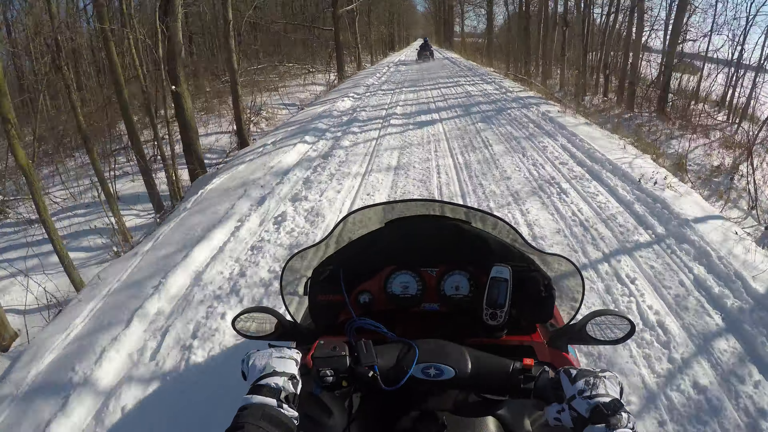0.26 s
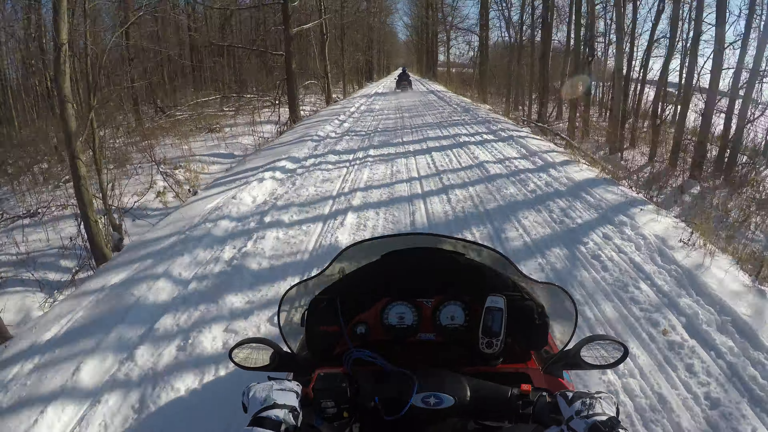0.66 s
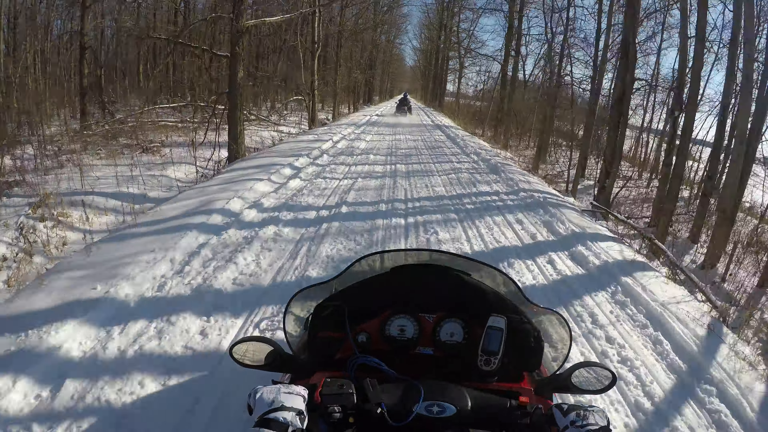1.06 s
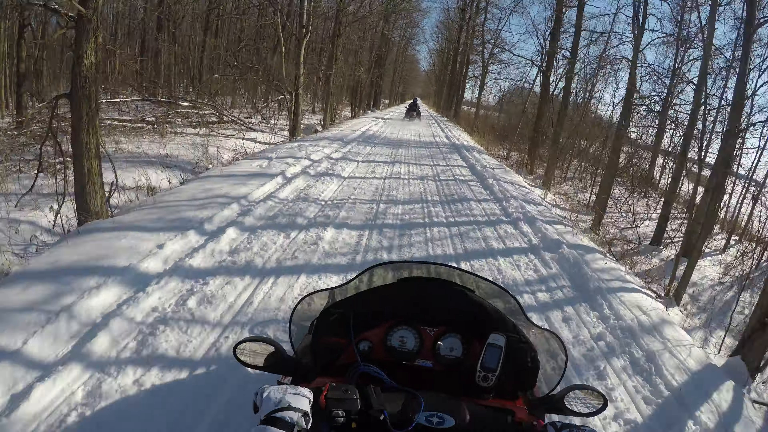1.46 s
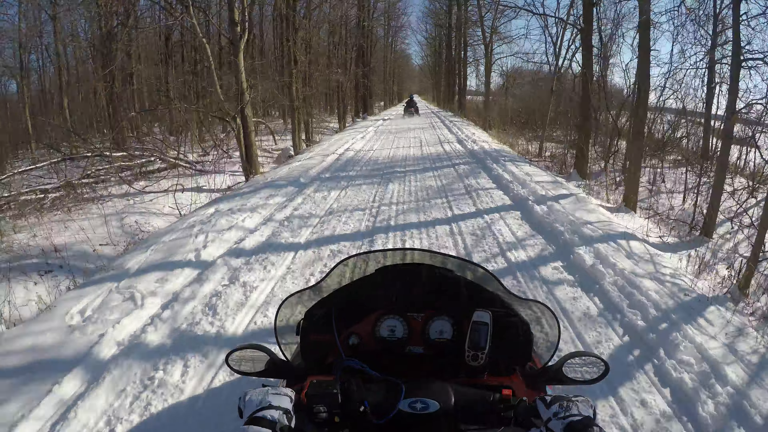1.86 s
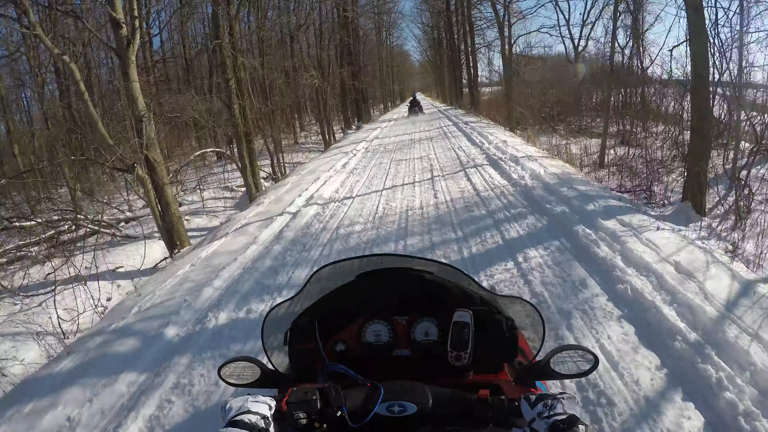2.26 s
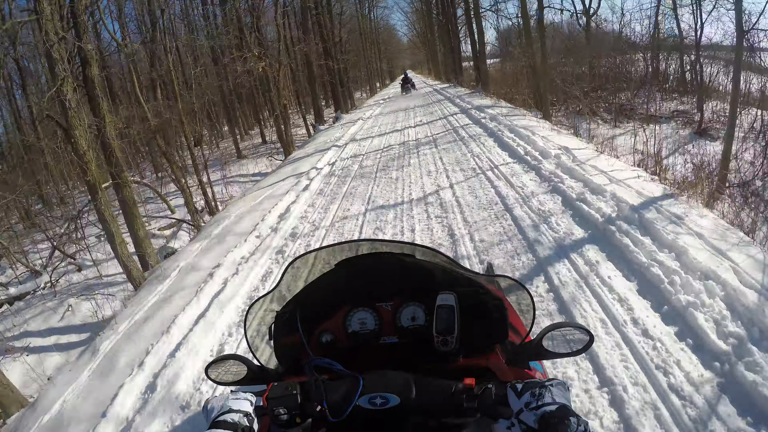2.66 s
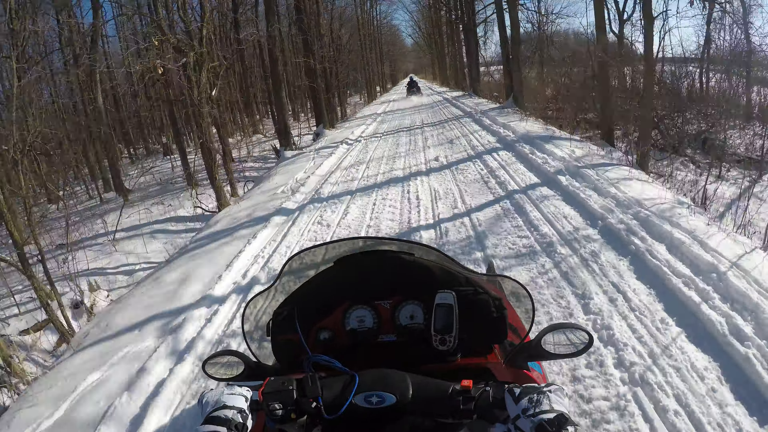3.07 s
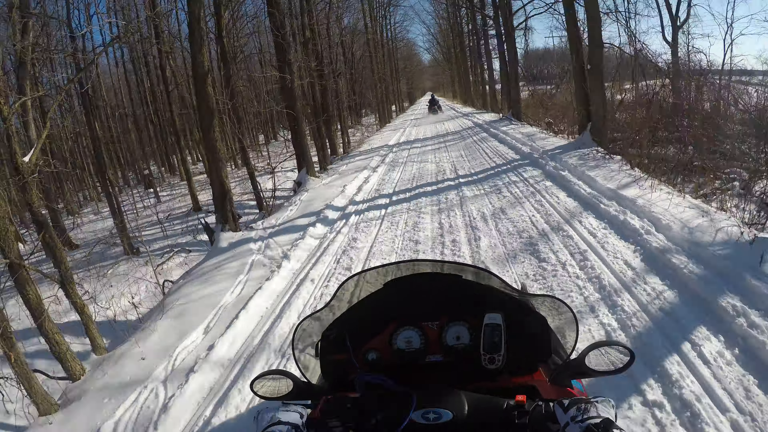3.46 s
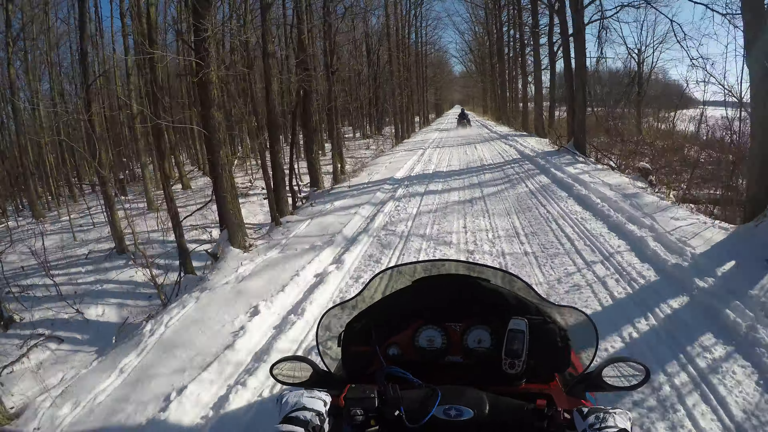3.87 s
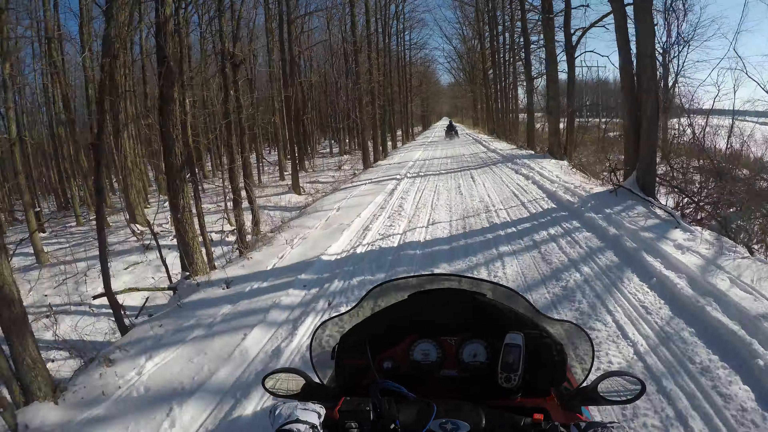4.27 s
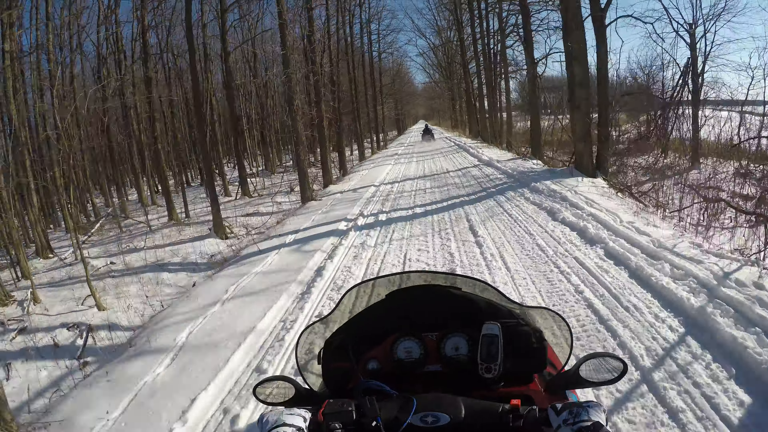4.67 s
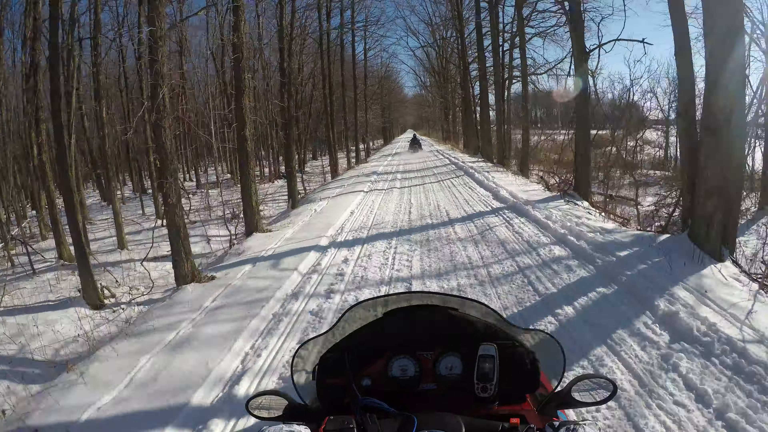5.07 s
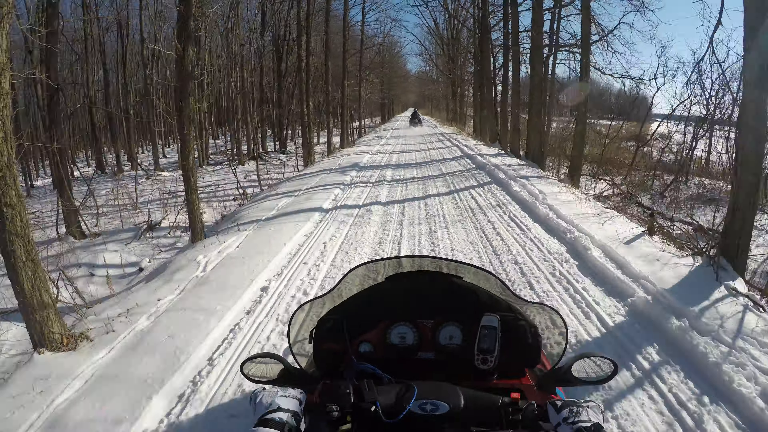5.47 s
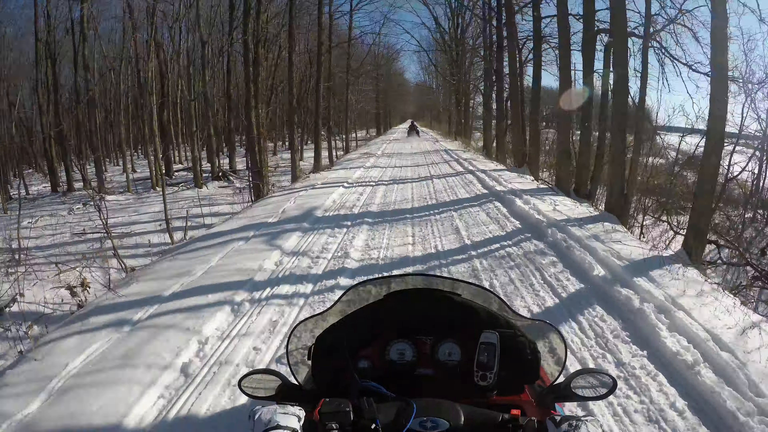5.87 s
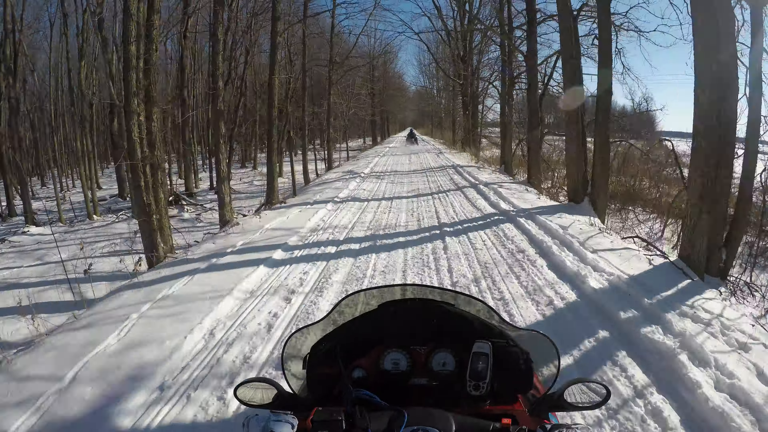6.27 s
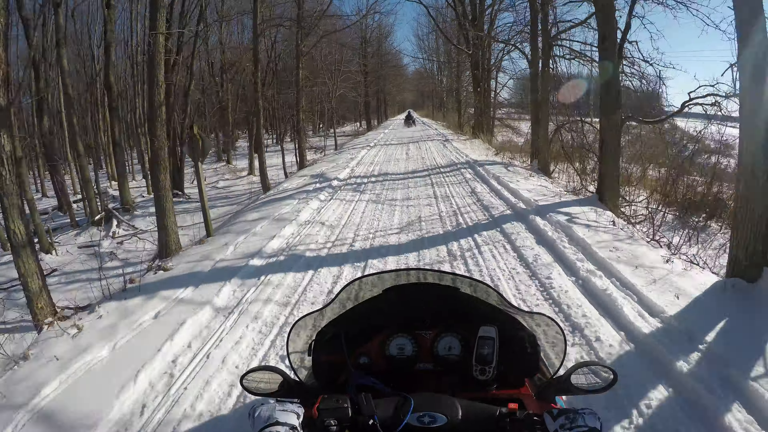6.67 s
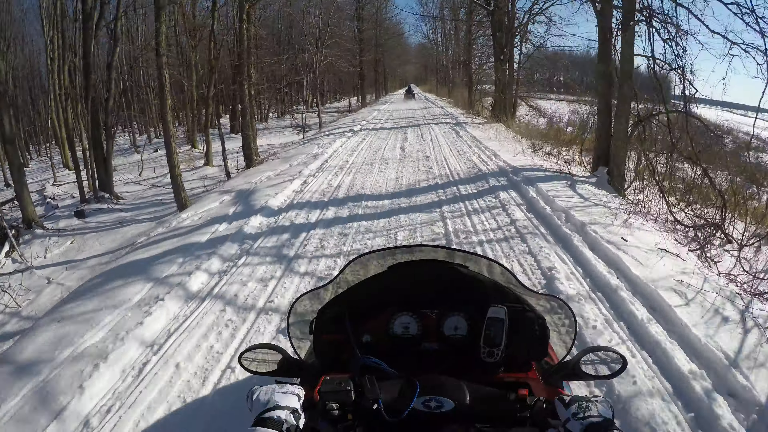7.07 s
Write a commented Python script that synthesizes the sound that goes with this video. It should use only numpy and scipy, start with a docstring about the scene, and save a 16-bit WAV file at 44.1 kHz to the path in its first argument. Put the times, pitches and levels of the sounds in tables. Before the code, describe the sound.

A single-channel, close helmet-mounted perspective on a moving snowmobile, already at speed when the sound begins. A two-cylinder engine drones with a low firing tone near 180 Hz, a nasal exhaust growl and a raspy clatter. Just below, the track lugs hum around 165 Hz, swelling and wavering. From 0 to 4.6 s engine pitch creeps up slightly; from about 5 to 6.5 s it sags, then climbs steadily from 7 s, reaching its highest, brightest and strongest drone around 8.5 to 9.2 s. Two faint fixed whines near 1.2 and 1.3 kHz come and go. Headwind surrounds everything: deep buffeting, low rumble, gusty roar, smoother rush and subdued hiss, with sharper gusts near 0.5, 2.4, 4.4, 5.9, 6.7, 7.7 and 8.4 s. Rough grain and brief dull knocks on the housing recur irregularly, clustering around 1.9 and 5.9 s. It ends still riding, without stopping.

```python
"""A two-cylinder engine drones as a snowmobile runs along a trail, heard at a closed housing on the helmet.
Engine: harmonics of the crank speed, weighted by exhaust resonances, with a noisy clatter once a turn.
Track: lugs on a toothed sprocket hum at the lug rate. Two thin whines hold their pitch.
A rough grain of small random damped knocks is stronger where the roar is; short thumps knock the housing.
Headwind: coloured noises that buffet, rumble, roar, rush and hiss around the housing."""
import sys
import numpy as np
from scipy import signal
from scipy.io import wavfile
from scipy.ndimage import uniform_filter1d, minimum_filter1d, map_coordinates

SR = 44100
rng = np.random.default_rng(int(sys.argv[2]) if len(sys.argv) > 2 else 0)


def to_wav(sig):
    """Store sig (one row per channel, or 1-D mono) as 16-bit WAV at the path in sys.argv[1].

    Samples outside -1..1 are clipped; the rate is SR.
    """
    pcm = np.clip(np.atleast_2d(sig), -1, 1) * 32767
    pcm = np.round(pcm).astype(np.int16)
    wavfile.write(sys.argv[1], SR, pcm.T)  # frames by channels


N = 407484
TIME_S = np.arange(N) / SR


def gain_of(db):
    """Logarithmic level: decibels become an amplitude factor."""
    return 10 ** (np.asarray(db) / 20)


def evened(x):
    """Normalisation: scales a signal to rms 1."""
    return x / np.sqrt(np.mean(x ** 2) + 1e-20)


def columns(rows):
    """Linear interpolation: each column of a curve table becomes one value a sample."""
    time_s, *values = np.transpose(rows)
    return [np.interp(TIME_S, time_s, v) for v in values]


def drift(per_s):
    """Low-rate random fluctuation of rms 1, with up to per_s swings a second."""
    knots = rng.standard_normal(400)
    wander = map_coordinates(knots, [TIME_S * 2 * per_s], order=1)
    return wander * np.sqrt(1.5)  # joining the knots by lines loses a third of the power


def tone(turns, db, blur, fade_db, per_s):
    """Phase and amplitude modulation: a sine wanders by blur (rms radians) and fade_db (rms)."""
    phase = 2 * np.pi * (turns + rng.random()) + blur * drift(per_s)
    level_db = db + fade_db * drift(per_s)
    return np.sqrt(2) * gain_of(level_db) * np.sin(phase)


def noise(colour, size, patchy_db, flicker_db):
    """Spectral synthesis: random short-time spectra, with drifting patches and a flicker shared by all bands."""
    frames = N // (size // 4) + 5
    bin_hz = np.fft.rfftfreq(size, 1 / SR)
    real, imaginary, patches = rng.standard_normal((frames, len(bin_hz), 3)).T
    patches = uniform_filter1d(patches, size=size // 64, axis=0)  # smooth over frequency
    patches = evened(uniform_filter1d(patches, size=8192 // size, axis=1))  # and over time
    flicker = evened(uniform_filter1d(rng.standard_normal(frames), size=4096 // size))
    colour_hz, colour_db = np.transpose(colour)
    # silent outside the band of the colour table
    shape_db = np.interp(np.log(bin_hz + 1), np.log(colour_hz), colour_db, left=-np.inf, right=-np.inf)
    level_db = shape_db[:, None] + patchy_db * patches + flicker_db * flicker
    spectra = (real + 1j * imaginary) * gain_of(level_db)
    sound = signal.istft(spectra, nperseg=size, noverlap=size * 3 // 4)[1]
    return evened(sound[:N])


# crank speed, before the flywheel smooths it: time_s, speed [turns per s]
CRANK_SPEED = [(0, 89.6), (.65, 89), (1.6, 89.55), (2.0, 90.9), (2.65, 91.15), (3.3, 92.4), (4.0, 92.97),
               (4.6, 94.1), (4.8, 93.95), (5.25, 92.75), (5.75, 90.25), (6.25, 87.3), (6.55, 86.4),
               (6.8, 86.9), (7.5, 90.03), (7.85, 92.4), (8.25, 94.4), (8.45, 96.2), (8.63, 98.7),
               (8.8, 100.1), (9.0, 100.9), (9.24, 101.2)]
# level of the firing tone: time_s, level_db
FIRING_LEVEL = [(0, -18), (.45, -26), (1.4, -24.5), (1.7, -18.5), (2.5, -20), (3.1, -27), (3.6, -19.5),
                (4.1, -12.5), (4.5, -19.5), (5.2, -21.5), (6.05, -34.5), (6.6, -27), (7.05, -26),
                (7.4, -13.5), (7.65, -20.5), (8.2, -25), (8.4, -14.5), (8.65, -13.5), (8.85, -7.5),
                (9.05, -9), (9.24, -16)]
# engine load, before the exhaust resonances: time_s, growl_db [multiples 3 to 6],
# rasp_db [multiples 7 and up], brightness_db [per octave above the tenth multiple]
ENGINE_LOAD = [(0, -43, -42, -6), (.6, -41, -38, -7), (1, -38, -37, -8), (1.5, -40, -37.5, -7),
               (2, -38, -39, -5), (2.5, -36, -40, -2), (3, -34, -40, -1), (3.5, -38, -37, -3),
               (3.9, -45, -38, -3), (4.4, -45, -42, -1), (4.75, -42, -42, -1), (5, -37, -39.5, -4),
               (5.4, -45, -38, -7), (5.8, -42, -36, -9), (6.2, -38, -40, -6), (6.7, -37, -42, -6),
               (7.1, -37, -39, -3), (7.4, -36, -39, -2), (7.75, -40, -38, -2), (8.1, -44, -36, 1),
               (8.3, -45, -35, 4), (8.58, -45, -35, 5), (8.8, -44, -39, 1), (9.24, -40, -39, -3)]
# resonances of exhaust and cowl: pitch_hz, width_hz [between the points 6 dB down], gain_db
EXHAUST_RESONANCES = [(275, 40, 8.5), (368, 50, 7.5), (440, 50, -4), (530, 60, 2.5), (700, 60, -4),
                      (835, 80, 2), (905, 50, 2), (1000, 65, 4), (1132, 105, 7), (1218, 50, 1),
                      (1312, 50, 1), (1420, 120, -2), (1650, 130, .5), (1840, 170, 2.5), (1960, 80, -6)]
# colour of the clatter, and of the rush of the wind: pitch_hz, density_db [relative, per Hz]
RUSH_COLOUR = [(500, -2.5), (800, -1.5), (1100, 2.5), (1400, 1.5), (1900, -1), (2100, -5.5), (2400, -4.5),
               (2900, -22)]
CRANK_SHAKE = .012  # rms radians; uneven firing shakes the crank, so high multiples blur most
HIGH_EVEN_DB = -4.5  # even multiples above the sixteenth are weaker
CLATTER_DB, CLATTER_GATE = 2., .9  # dB re the rasp before pulsing; depth of the pulse, a share


def engine():
    """Harmonic series through resonances: two firings a turn drone, and multiples swell near a resonance."""
    crank_hz, = columns(CRANK_SPEED)
    firing_db, = columns(FIRING_LEVEL)
    growl_db, rasp_db, bright_db = columns(ENGINE_LOAD)
    # the inertia of the flywheel rounds changes of speed
    smooth_hz = uniform_filter1d(crank_hz, size=SR // 5, mode="nearest")
    turns = np.cumsum(smooth_hz) / SR
    turns = turns + CRANK_SHAKE * drift(7.) / (2 * np.pi)
    out = tone(2 * turns, firing_db, blur=.15, fade_db=.7, per_s=10.)
    for k in range(3, 22):
        passed_power = 0
        for centre_hz, width_hz, gain_db in EXHAUST_RESONANCES:
            detuning = 2 * (k * crank_hz - centre_hz) / width_hz
            passed_power = passed_power + gain_of(2 * gain_db) / (1 + detuning ** 2) ** 2
        if k < 7:
            source_db = growl_db
        else:
            source_db = rasp_db + bright_db * max(np.log2(k / 10), 0)
        if k > 16 and k % 2 == 0:
            source_db = source_db + HIGH_EVEN_DB
        out += np.sqrt(passed_power) * tone(k * turns, source_db, blur=.15, fade_db=.9, per_s=2.5)
    pulse = 1 + CLATTER_GATE * np.cos(2 * np.pi * turns)
    clatter = noise(RUSH_COLOUR, size=512, patchy_db=0., flicker_db=1.)
    return out + gain_of(rasp_db + CLATTER_DB) * pulse * clatter


# track speed: time_s, speed [lugs per s]
LUG_RATE = [(0, 171.7), (.75, 169.5), (1.0, 167.4), (1.5, 167.5), (2.0, 164.5), (2.25, 164.8),
            (2.55, 165.5), (2.75, 164.2), (4.0, 164.8), (4.5, 167.6), (5.0, 167.7), (5.25, 169), (5.5, 167),
            (5.7, 168), (5.9, 169.2), (6.75, 163.7), (7.5, 163.4), (8.0, 160.5), (8.3, 163.8), (8.6, 164.5),
            (8.8, 169), (9.0, 171.5), (9.24, 173.7)]
# lug hum: time_s, hum_db, octave_db
LUG_HUM = [(0, -27, -27), (.17, -13.5, -32), (.26, -20.5, -41), (.5, -13.5, -25), (.65, -19.5, -34),
           (.85, -15, -25), (1.1, -15.5, -36), (1.35, -14, -26), (1.41, -12.5, -23), (1.46, -21, -42),
           (1.52, -13.5, -29), (2.0, -12.5, -28), (2.45, -13, -31), (3.0, -15.5, -31), (3.58, -14, -30),
           (3.7, -9.5, -29), (3.95, -8.5, -35), (4.37, -11, -36), (4.44, -22, -27), (4.54, -26, -23),
           (4.65, -17, -30), (4.8, -17, -23.5), (4.95, -14.5, -25.5), (5.35, -17, -24), (5.66, -12, -26.5),
           (5.74, -16, -20), (5.87, -31, -17.5), (5.96, -15, -26), (6.36, -13, -32), (6.45, -24.5, -24),
           (6.52, -10, -22), (6.6, -12.5, -31), (6.95, -18, -30), (7.25, -11.5, -32), (7.58, -9.5, -35),
           (7.64, -21, -23), (7.8, -15.5, -23.5), (8.1, -28, -32), (8.3, -9, -33), (8.57, -12.5, -21.5),
           (8.68, -23, -27), (8.85, -25, -29.5), (9.1, -18, -31), (9.24, -22, -30)]
# strength of the sprocket wobble: time_s, level_db
WOBBLE_LEVEL = [(0, -32), (.9, -27), (1.4, -25), (1.9, -32), (2.5, -26), (3, -32), (4.7, -34), (5.1, -22),
                (6.2, -21), (6.6, -31), (7, -30), (7.4, -38), (9.24, -36)]
# multiples of its own turn from an uneven sprocket: multiple [of the turn rate], level_db [re the wobble]
WOBBLE_MULTIPLES = [(2, -8), (4, -1), (5, 0)]
# multiples beside the lug hum, from its beating: multiple [of the turn rate], level_db [re the smoothed hum]
SIDE_MULTIPLES = [(6, -16), (10, -14)]
SPROCKET_TEETH = 8


def track():
    """Tooth-meshing tones: lugs on sprocket teeth give a hum, its octave and multiples of the sprocket turn."""
    hum_db, octave_db = columns(LUG_HUM)
    wobble_db, = columns(WOBBLE_LEVEL)
    lugs = np.cumsum(columns(LUG_RATE)[0]) / SR
    sprocket_turns = lugs / SPROCKET_TEETH
    out = tone(lugs, hum_db, blur=.27, fade_db=1.3, per_s=11.)  # the hum swells and sinks at random
    out += tone(2 * lugs, octave_db, blur=.8, fade_db=2., per_s=11.)
    for multiple, db in WOBBLE_MULTIPLES:
        out += tone(multiple * sprocket_turns, wobble_db + db, blur=.3, fade_db=1.5, per_s=3.)
    slow_hum_db = uniform_filter1d(hum_db, size=SR // 2)
    for multiple, db in SIDE_MULTIPLES:
        out += tone(multiple * sprocket_turns, slow_hum_db + db, blur=.6, fade_db=2., per_s=6.)
    return out


# levels of the two whines: time_s, lower_db, upper_db
WHINE_LEVELS = [(0, -42.5, -51), (1.15, -33.5, -47), (1.9, -34, -40), (2.15, -43, -39.5), (3.1, -50, -50.5),
                (3.75, -29.5, -42), (4.4, -48, -49.5), (5.25, -33, -43), (6.2, -33.5, -44), (7.4, -36, -50),
                (7.9, -34.5, -44.5), (8.9, -43, -44), (9.24, -29, -42)]
LOWER_WHINE_HZ, UPPER_WHINE_HZ = 1222, 1313


def whines():
    """Steady-frequency tones: two thin whines keep their pitch whatever the engine does."""
    lower_db, upper_db = columns(WHINE_LEVELS)
    lower = tone(LOWER_WHINE_HZ * TIME_S, lower_db, blur=.6, fade_db=1.2, per_s=12.)
    upper = tone(UPPER_WHINE_HZ * TIME_S, upper_db, blur=.6, fade_db=1.2, per_s=12.)
    return lower + upper


GRAIN_DB, GRAIN_PER_S = -11, 120  # level re the roar column of the wind; mean knocks a second
GRAIN_SPREAD_DB = 3.5  # mean of the exponential spread of knock sizes, before its cap
GRAIN_LOW_HZ, GRAIN_HIGH_HZ, GRAIN_PITCHES = 422, 1510, 8
GRAIN_T60_S, GRAIN_RISE_S = .015, .00065  # time to ring down 60 dB; soft start


def rough_grain():
    """Random impulses into damped resonators: small knocks make a rough grain, stronger where the roar is."""
    happens = rng.random(N) < GRAIN_PER_S / SR
    spread = np.minimum(rng.exponential(1, N), 4)  # mostly small, a few large
    knock_size = gain_of(GRAIN_SPREAD_DB * spread) * happens
    kind = rng.integers(0, GRAIN_PITCHES, N)
    t = np.arange(2000) / SR
    envelope = (1 - np.exp(-(t / GRAIN_RISE_S) ** 2)) * gain_of(-60 * t / GRAIN_T60_S)
    knocks = np.zeros(N)
    for k, pitch_hz in enumerate(np.geomspace(GRAIN_LOW_HZ, GRAIN_HIGH_HZ, GRAIN_PITCHES)):
        ring = envelope * np.sin(2 * np.pi * pitch_hz * t)
        knocks += signal.oaconvolve(knock_size * (kind == k), ring)[:N]
    roar_db = columns(WIND_LEVELS)[2]
    return gain_of(GRAIN_DB + roar_db) * evened(knocks)


# bumps and gusts that knock the housing: start_s, level_db [envelope peak], pitch_hz,
# length_s [onset to envelope peak, raised to 0.001 if shorter]
HOUSING_THUMPS = [(0.602, -15, 460, .002), (0.935, -8, 350, 0.0022), (1.412, -12, 520, 0.0032),
                  (1.786, -9, 740, 0.00094), (1.85, -10, 1100, 0.00099), (1.902, -17, 1150, 0.001),
                  (1.911, -9, 447, 0.0013), (2.318, -11, 910, 0.00094), (2.534, -14, 850, .0012),
                  (2.841, -7, 367, 0.0014), (3.155, -18, 480, .002), (3.249, -9, 540, .0015),
                  (3.312, -14, 735, .0012), (4.101, -16, 1000, 0.0013), (4.126, -18, 800, .0014),
                  (4.445, -10, 980, 0.0009), (4.744, -7, 357, 0.0017), (4.9, -13, 1200, 0.001),
                  (5.05, -12.5, 1020, .0015), (5.578, -14, 1000, 0.001), (5.647, -6, 340, 0.0016),
                  (5.879, -14, 790, 0.0025), (5.919, -6, 378, 0.0023), (5.958, -7, 450, 0.0014),
                  (6.186, -13, 348, 0.00098), (6.284, -6, 510, 0.0011), (6.666, -15, 706, 0.0014),
                  (6.68, -8, 615, 0.0014), (6.716, -9, 700, 0.00093), (7.327, -17, 363, 0.0018),
                  (7.642, -15, 360, .002), (7.663, -16, 1010, 0.0011), (7.688, -11, 680, 0.0011),
                  (7.792, -12, 402, 0.0056), (8.169, -10, 1260, 0.0015), (8.385, -11, 796, .0015),
                  (8.528, -8, 600, 0.0012), (8.721, -11, 350, 0.0015), (8.96, -15, 385, 0.0022),
                  (9.063, -18, 410, 0.0022), (9.152, -13, 1050, 0.0018)]


def thumps():
    """Damped oscillation: each bump or gust knocks the housing, which rings briefly and dies away."""
    out = np.zeros(N + 2000)
    t = np.arange(2000) / SR
    for start_s, level_db, pitch_hz, length_s in HOUSING_THUMPS:
        u = t / max(length_s, .001)
        envelope = u * np.exp(1 - u)  # peaks at 1 when u is 1
        start = round(start_s * SR)
        out[start:start + 2000] += gain_of(level_db) * envelope * np.sin(2 * np.pi * pitch_hz * t)
    return out[:N]


# headwind before lumps and gusts: time_s, buffeting_db, rumble_db, roar_db, rush_db, hiss_db,
# hollow_db [fill of the hollow under the hiss]
WIND_LEVELS = [(0, -14, -11, -22, -22.5, -36.5, -34.5), (.35, -14.5, -18.5, -23.5, -27.5, -41.5, -37.5),
               (.8, -18, -19.5, -24, -26, -38.5, -36.5), (1.3, -13.5, -21, -20, -24, -35, -37),
               (1.75, -20, -14, -23.5, -26.5, -35, -40), (2.15, -21.5, -18.5, -27.5, -26.5, -34.5, -38),
               (2.45, -23, -13.5, -23, -24, -32.5, -35), (3.1, -14, -20, -20, -23.5, -32, -34.5),
               (3.4, -18, -15.5, -21, -23.5, -34.5, -33), (3.55, -21, -16.5, -27, -25.5, -34, -38),
               (3.75, -19, -16.5, -27, -25, -32, -39), (4.3, -22, -16, -32, -28.5, -35.5, -43.5),
               (4.65, -19.5, -21, -31, -29, -36.5, -39), (4.85, -14.5, -18.5, -24, -24, -35, -38),
               (5.4, -20.5, -16, -27, -26, -32.5, -39), (5.85, -14.5, -17, -22, -27, -34.5, -40.5),
               (6.3, -14.5, -22.5, -19.5, -29, -35, -40.5), (6.55, -16.5, -16, -25, -29, -34.5, -45),
               (6.95, -16.5, -19, -21, -27.5, -35, -41), (7.45, -25.5, -13, -26, -25, -32.5, -41),
               (7.9, -17, -17.5, -24.5, -30.5, -33.5, -39), (8.3, -19, -15.5, -21, -24, -32, -37),
               (8.9, -22.5, -14, -20.5, -26, -31.5, -38), (9.15, -11.5, -17, -20, -23, -31.5, -34),
               (9.24, -20, -16, -17.5, -24, -33, -36)]
# short gusts in the roar: peak_time_s, lift_db [negative for a dip]
ROAR_GUSTS = [(.16, 6), (.47, 7), (.88, 5.5), (1.31, 2.5), (1.4, 1.5), (1.79, -9), (2.3, 3), (2.4, 7.5),
              (2.78, 5), (3.86, 5), (4.11, 9), (4.445, 12.5), (4.81, 3), (4.9, 6), (5.06, 4), (5.53, 7),
              (5.9, 7.5), (6.67, 9), (6.82, 4), (7.68, 8.5), (8.18, 2), (8.27, 2), (8.38, 6.5), (9.13, 3.5)]
# colours of the wind layers: pitch_hz, density_db [relative, per Hz]
BUFFET_COLOUR = [(15, -20.5), (30, -11), (45, -4.5), (80, 0.5), (125, -1), (170, -1.5), (220, -25)]
RUMBLE_COLOUR = [(110, -14), (150, 3), (210, 7), (260, -5.5), (330, -4), (420, -8.5), (520, -27)]
ROAR_COLOUR = [(250, -1), (400, -1.5), (600, -6.5), (900, -10), (1300, -24)]
HOLLOW_COLOUR = [(1800, -16), (2500, -4.5), (3100, -6), (3700, -5), (4600, -5.5)]
HISS_COLOUR = [(2600, -15), (3300, -16), (3900, -5.5), (4450, -1.5), (5300, -7), (6200, -10.5),
               (6900, -24.5), (7800, -38.5), (9000, -48)]
FIZZ_COLOUR = [(6000, 0), (6800, -1), (7900, -8), (8600, -8), (9600, -18.5), (11000, -27.5), (13500, -33.5)]
GUST_S = .029  # half width of a gust, where its dB lift has fallen to 1/e
LUMPS_PER_S = 7.  # swings a second of the chance lumps
RUSH_FOLLOWS, HOLLOW_FOLLOWS = .16, .23  # dB for each dB that lumps and gusts lift the roar


def wind():
    """Turbulent broadband noise: lumpy buffeting, a rumble, a gusty roar, a smoother rush and a housing hiss."""
    buffet_db, rumble_db, roar_db, rush_db, hiss_db, hollow_db = columns(WIND_LEVELS)
    # chance lumps, rms dB
    buffet_db = buffet_db + 1.4 * drift(LUMPS_PER_S)
    rumble_db = rumble_db + 1.3 * drift(LUMPS_PER_S)
    gust_db = 1.4 * drift(LUMPS_PER_S)
    hiss_lumps_db = .21 * drift(LUMPS_PER_S)
    for peak_s, lift_db in ROAR_GUSTS:
        gust_db += lift_db * np.exp(-((TIME_S - peak_s) / GUST_S) ** 2)
    fizz_db = -52.5 + 1.7 * (hiss_db + 33.5)  # the top grows faster than the hiss
    rush_db = rush_db + RUSH_FOLLOWS * gust_db
    hollow_db = hollow_db + HOLLOW_FOLLOWS * gust_db

    out = gain_of(buffet_db) * noise(BUFFET_COLOUR, size=4096, patchy_db=.3, flicker_db=2.5)
    out += gain_of(rumble_db) * noise(RUMBLE_COLOUR, size=2048, patchy_db=.4, flicker_db=1.1)
    out += gain_of(roar_db + gust_db) * noise(ROAR_COLOUR, size=1024, patchy_db=.8, flicker_db=.6)
    out += gain_of(rush_db) * noise(RUSH_COLOUR, size=512, patchy_db=1., flicker_db=.5)
    out += gain_of(hollow_db) * noise(HOLLOW_COLOUR, size=512, patchy_db=.7, flicker_db=.7)
    out += gain_of(fizz_db) * noise(FIZZ_COLOUR, size=512, patchy_db=1., flicker_db=.1)
    out += gain_of(hiss_db + hiss_lumps_db) * noise(HISS_COLOUR, size=512, patchy_db=.2, flicker_db=.5)
    return out


def scene():
    """Superposition: machine, grain, thumps and wind add in one channel."""
    machine = engine() + track() + whines()
    surroundings = rough_grain() + thumps() + wind()
    return (machine + surroundings)[None]


LIMIT_DB, LIMIT_SHARE = -2.2, .75  # peak level where limiting begins; share of the excess dB removed
LIMIT_WINDOW = 500  # samples, about 11 ms
EDGE_HZ = 14800  # upper band limit


def record(dry):
    """Gain reduction and low-pass filtering: loud swings are held down briefly, then the top is cut."""
    peak = -minimum_filter1d(-abs(dry[0]), size=LIMIT_WINDOW)  # largest swing within the window
    excess_db = np.maximum(20 * np.log10(peak + 1e-9) - LIMIT_DB, 0)
    held = dry / gain_of(LIMIT_SHARE * uniform_filter1d(excess_db, size=LIMIT_WINDOW))
    held = held * np.minimum(np.arange(N) / 200, 1)  # soft start
    low_pass = signal.firwin(511, EDGE_HZ, window=("kaiser", 9), fs=SR)
    return signal.oaconvolve(held, low_pass[None], "same")


dry = scene()
out = record(dry)
to_wav(out)
```